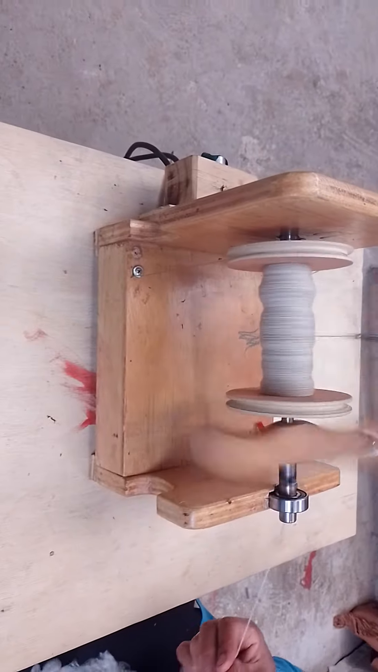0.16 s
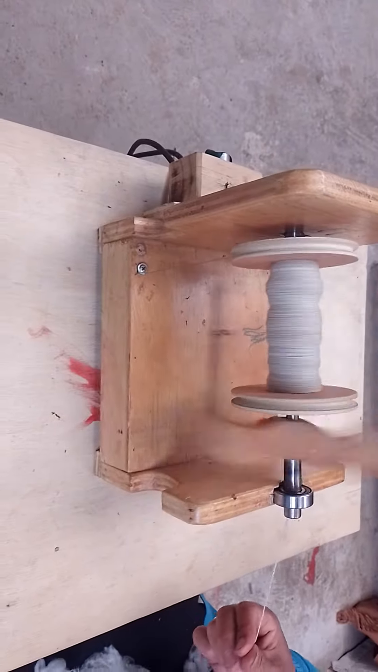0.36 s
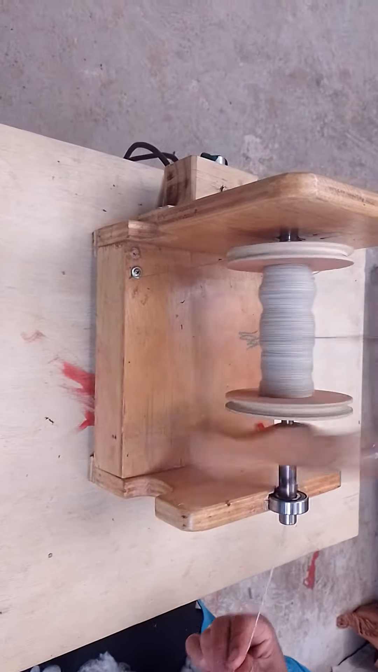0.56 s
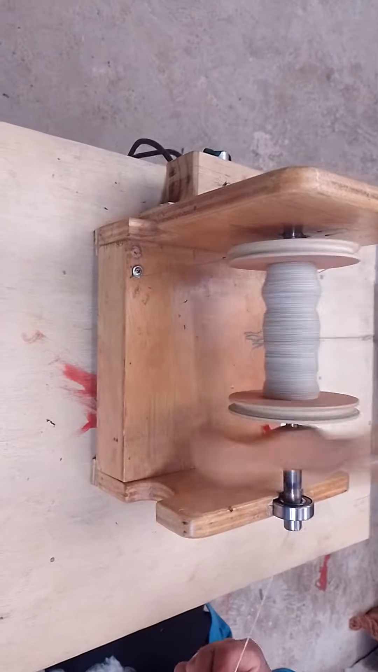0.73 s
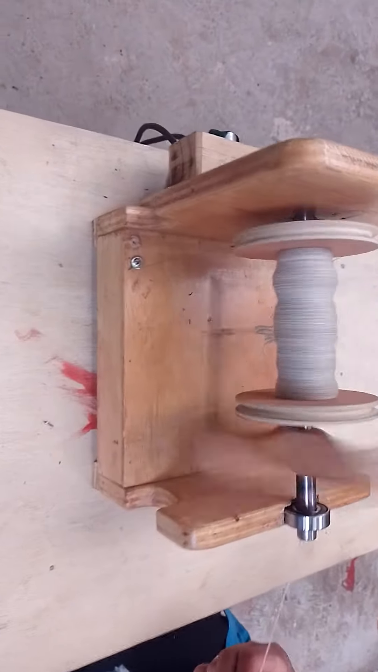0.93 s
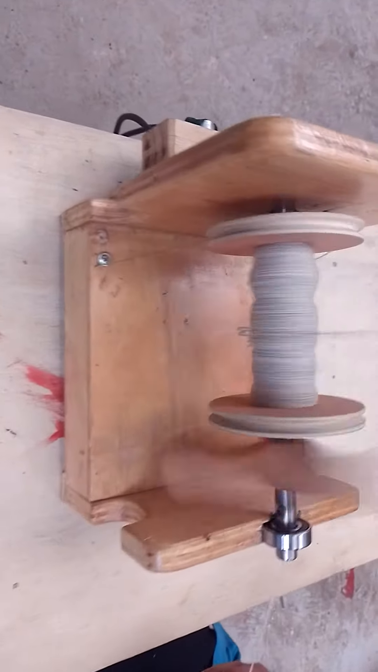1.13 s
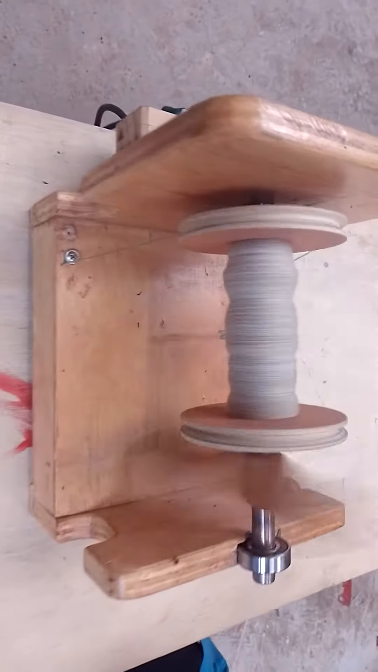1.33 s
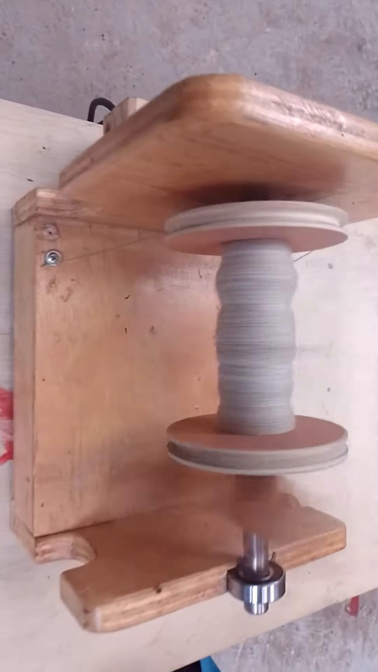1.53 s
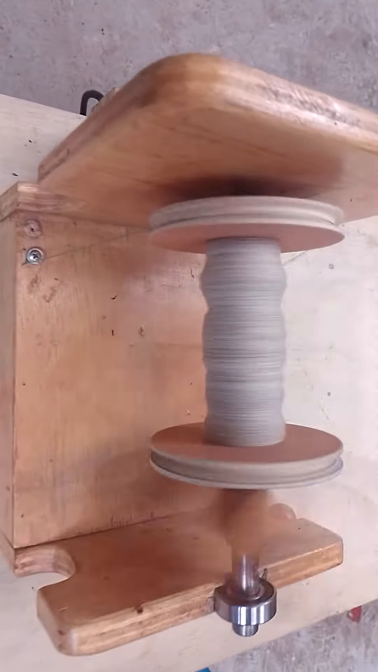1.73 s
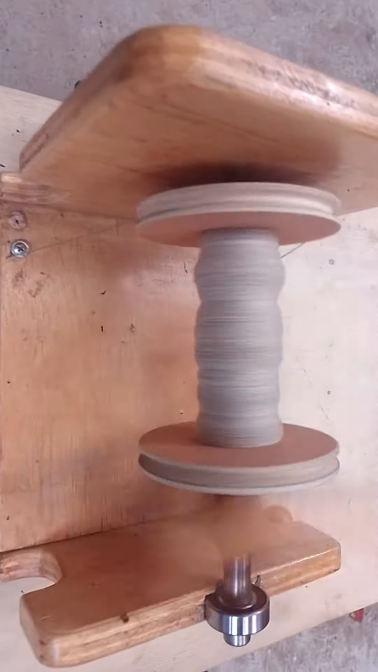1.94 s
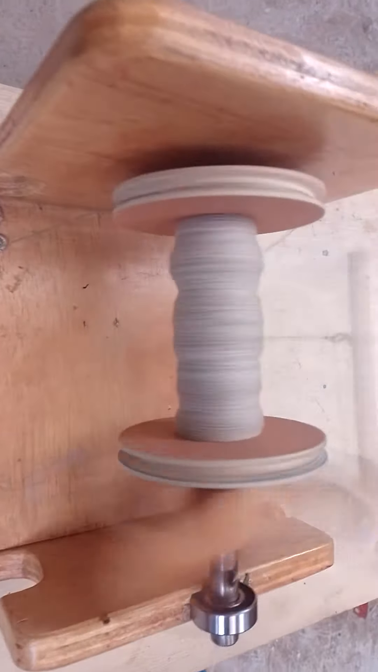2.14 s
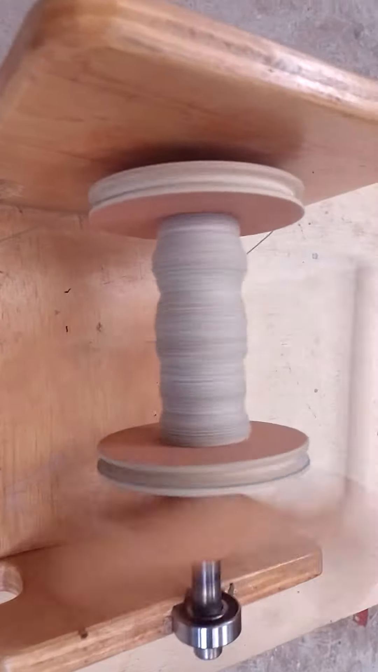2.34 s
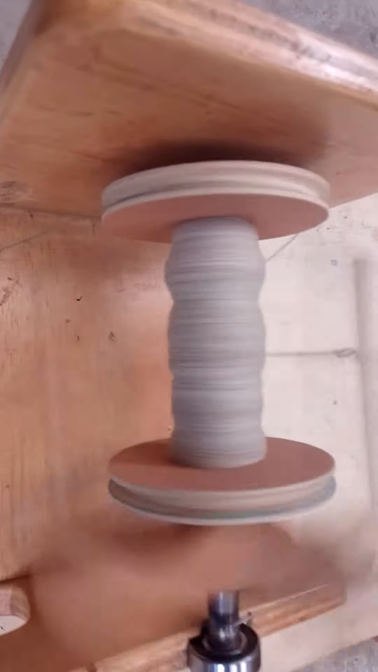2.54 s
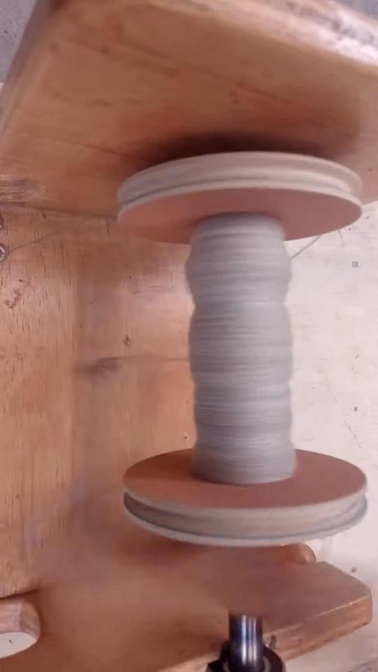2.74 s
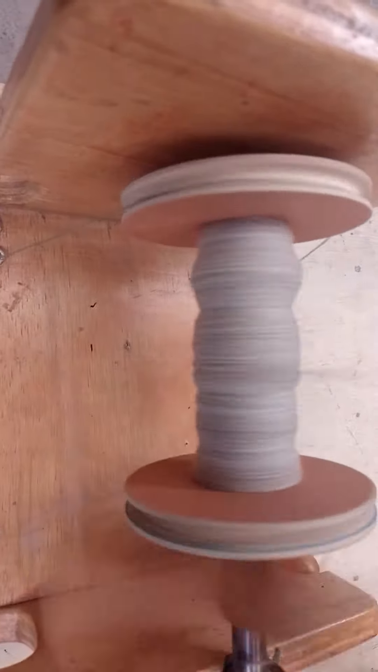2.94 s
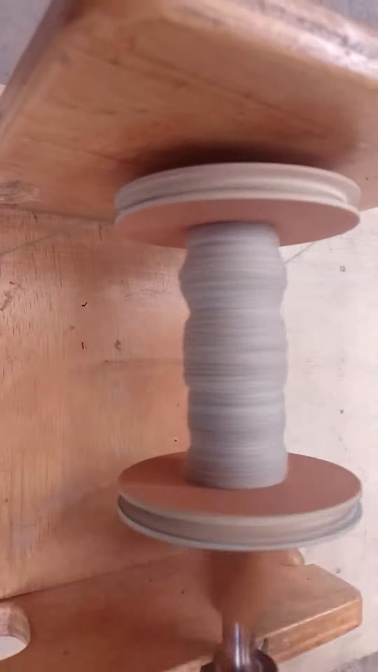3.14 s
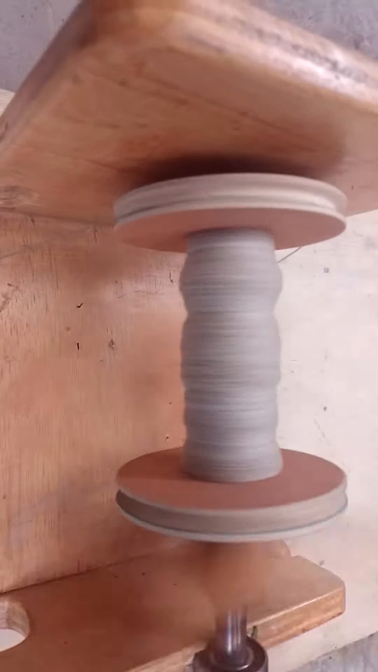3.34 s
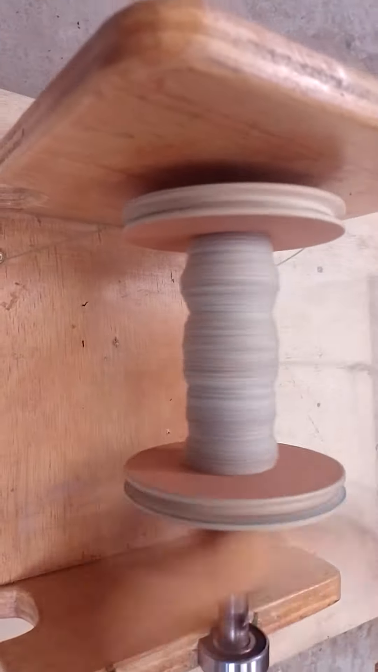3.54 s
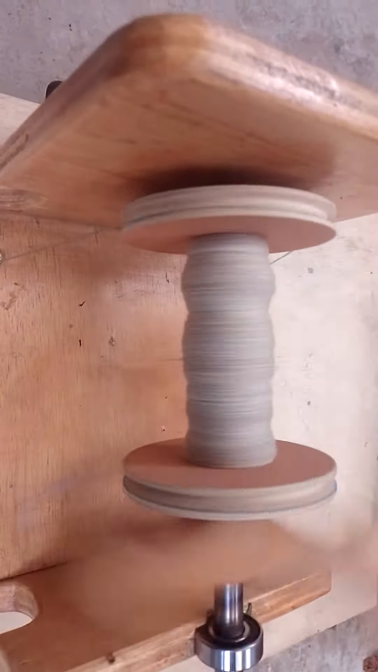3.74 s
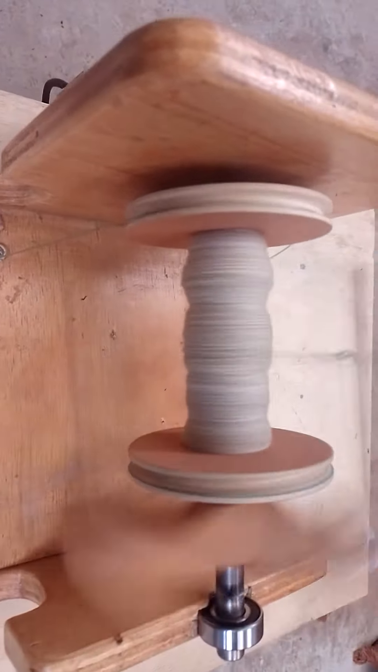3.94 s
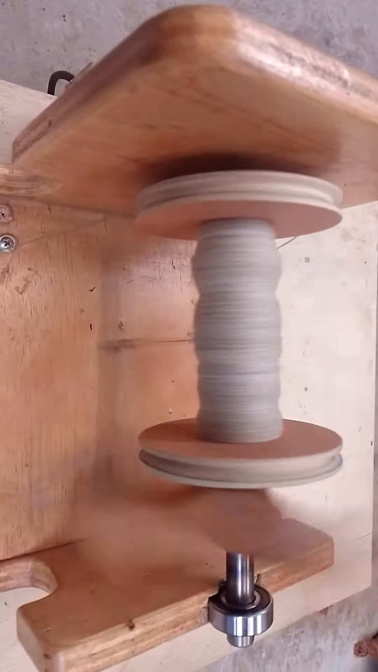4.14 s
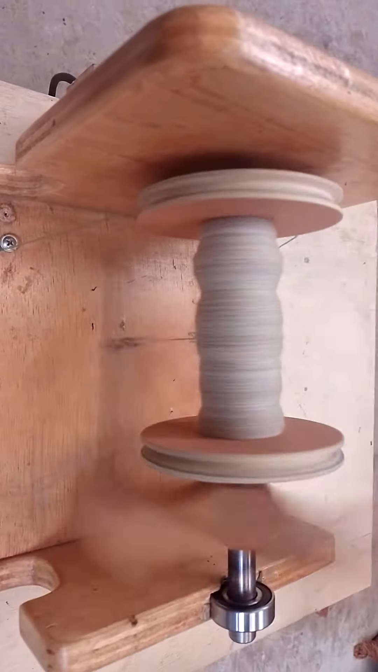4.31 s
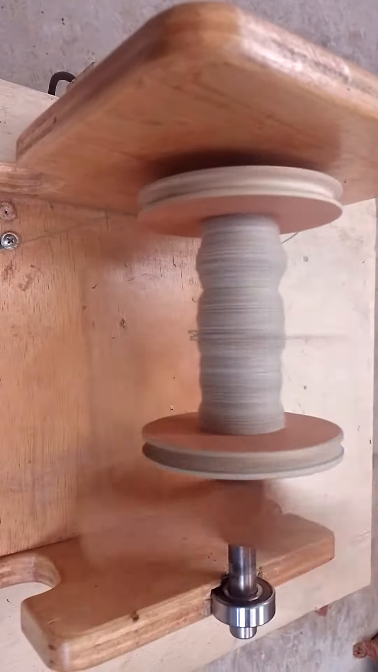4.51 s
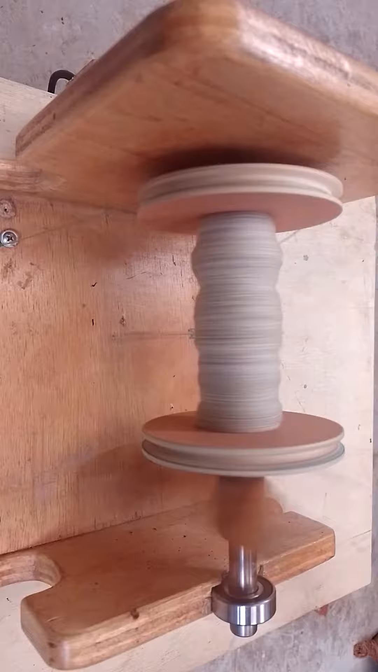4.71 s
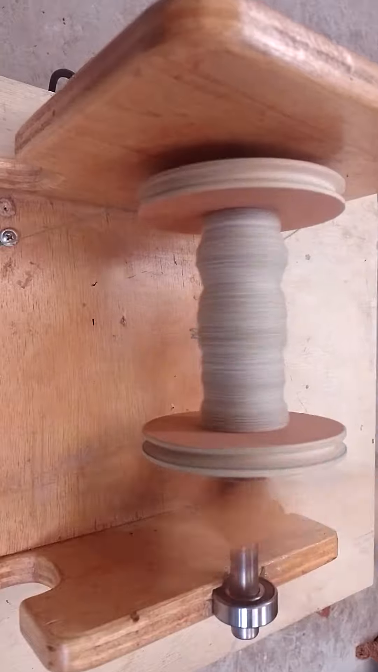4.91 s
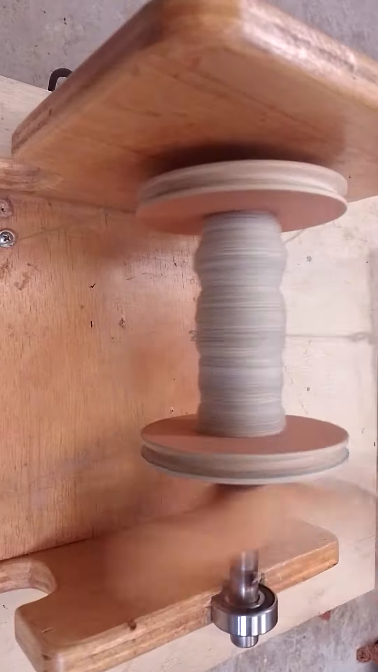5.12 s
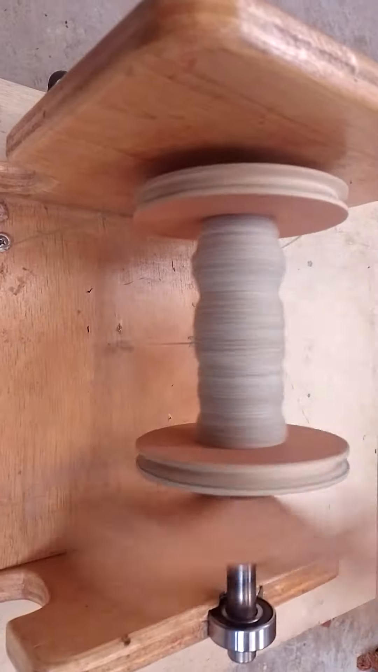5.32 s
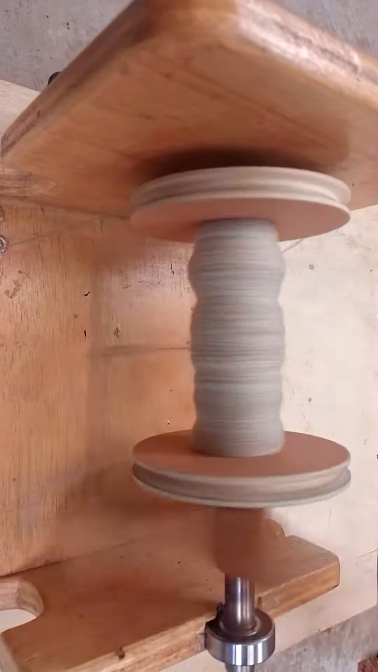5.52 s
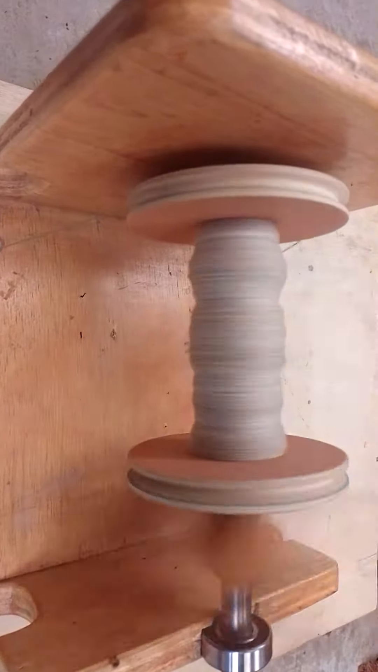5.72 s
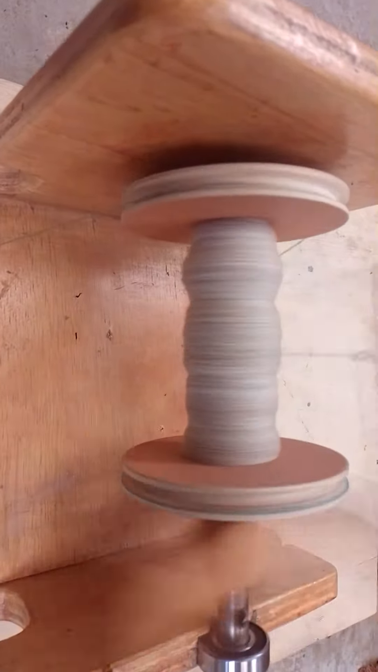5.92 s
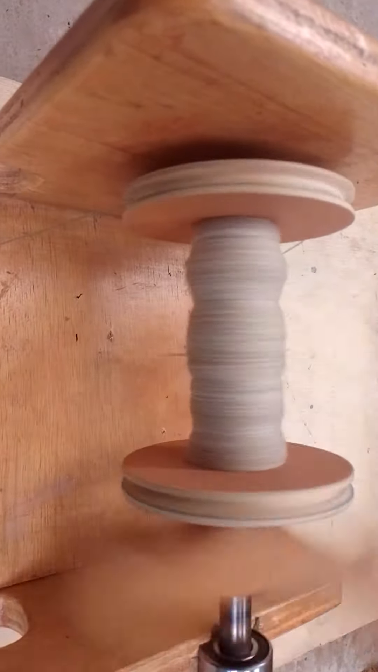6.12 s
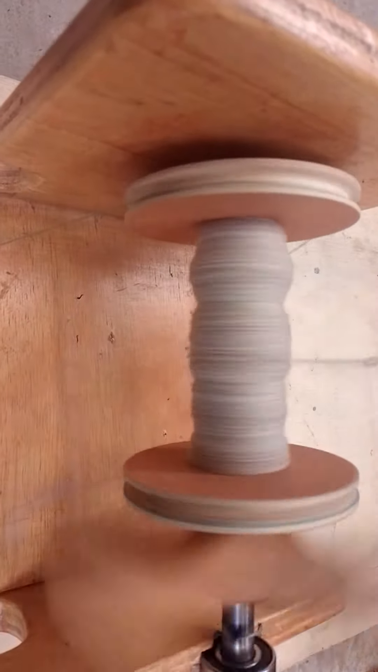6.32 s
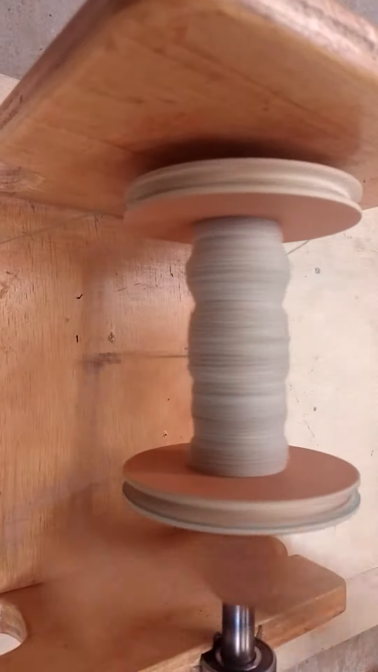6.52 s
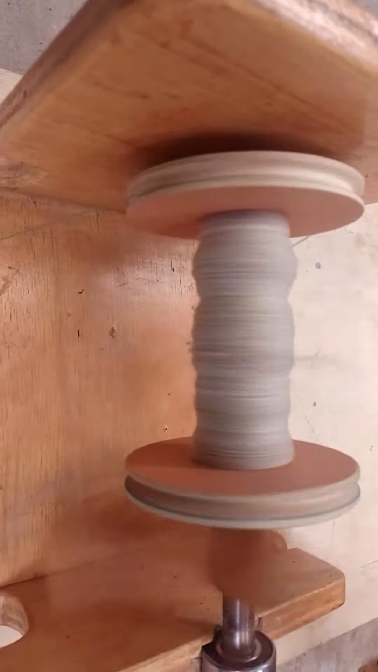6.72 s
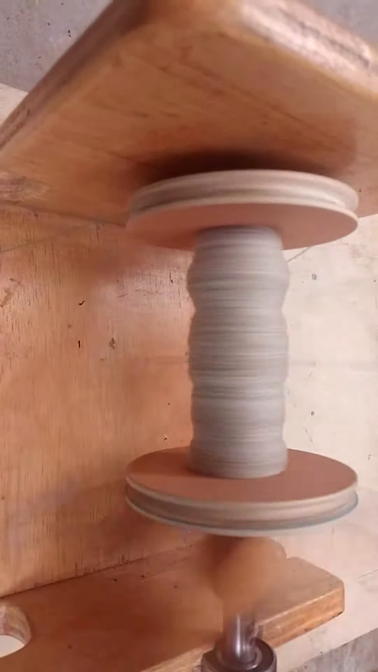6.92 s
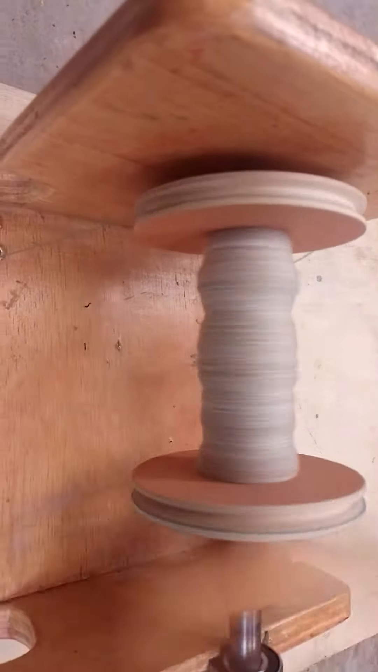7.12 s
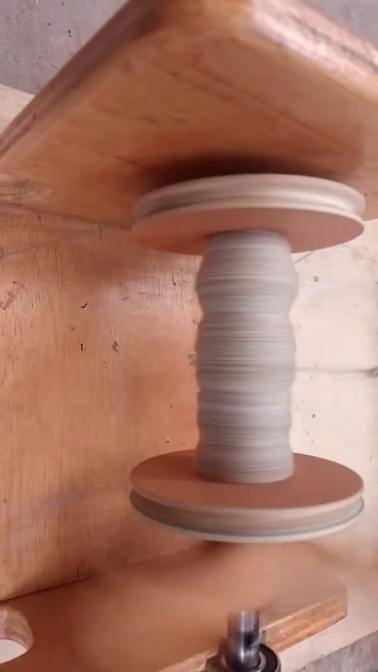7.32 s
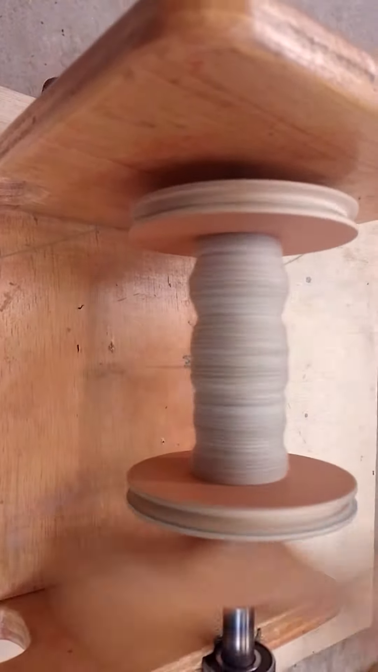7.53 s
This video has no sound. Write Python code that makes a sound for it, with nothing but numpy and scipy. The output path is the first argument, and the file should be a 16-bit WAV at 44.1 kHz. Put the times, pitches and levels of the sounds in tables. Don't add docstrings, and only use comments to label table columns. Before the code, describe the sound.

A small electric spinning wheel runs continuously on a wooden table indoors. Its motor whine wavers rapidly with an uneven drive band, over a low wooden drone. The microphone starts at a little distance, swings round the side where bearing hiss and metallic ringing rise, then moves close to the loose bobbin. Rapid paired ticks, about twelve turns a second, grow into hard irregular slaps that stay strong to the end.

```python
import sys
import numpy as np
from scipy import signal
from scipy.io import wavfile

SR = 44100
rng = np.random.default_rng(int(sys.argv[2]) if len(sys.argv) > 2 else 0)


def wav_out(sig):
    wavfile.write(sys.argv[1], SR, np.round(np.clip(np.atleast_2d(sig).T, -1, 1) * 32767).astype(np.int16))


def how_loud(loudness_db):
    steps = np.asarray(loudness_db, float) / 20
    return 10 ** steps


N = 337806

MOTOR_TURNS_PER_LAP, FLYER_TURNS_PER_LAP, BOBBIN_TURNS_PER_LAP = 26, 4.73, 4.92


def rms_one(x):
    return x / np.sqrt(np.mean(x ** 2) + 1e-20)


def in_time(rows):
    s, *columns = np.transpose(rows)
    return [np.interp(np.arange(N) / SR, s, c) for c in columns]


def drift(rate_hz):
    r = np.exp(-40 * np.pi * rate_hz / SR)
    noise = rng.standard_normal(N // 20 + 4002)
    slow = signal.lfilter([1], [1, -2 * r, r * r], noise)[4000:]
    return np.interp(np.arange(N) / 20, np.arange(len(slow)), rms_one(slow))


def band_pass(x, low_hz, high_hz):
    return signal.sosfilt(signal.butter(2, [low_hz, high_hz], "band", fs=SR, output="sos"), x)


def resonance(x, hz, width_hz):
    r = np.exp(-np.pi * width_hz / SR)
    top = (1 - r * r) / 2
    return signal.lfilter([top, 0, -top], [1, -2 * r * np.cos(2 * np.pi * hz / SR), r * r], x)


def colour(x, spectra, viewpoint, size):
    hz, s, frames = signal.stft(x, SR, nperseg=size, noverlap=size * 3 // 4)
    log_hz = np.log(hz + 1)
    shapes = []
    for spectrum in spectra:
        point_hz, point_db = np.transpose(spectrum)
        shapes.append(np.interp(log_hz, np.log(point_hz), point_db, -200, -200))
    at = np.interp(s, np.arange(N) / SR, viewpoint)
    shares = np.array([np.interp(at, np.arange(len(spectra)), row) for row in np.eye(len(spectra))])
    gain = how_loud(np.array(shapes).T @ shares) * np.sqrt(SR / 2)
    return signal.istft(frames * gain, SR, nperseg=size, noverlap=size * 3 // 4)[1][:N]


def grit(per_s, spread_db, share):
    sizes = how_loud(spread_db * np.minimum(rng.exponential(1, N), 3)) * rng.choice([-1, 1], N)
    knocks = rms_one(sizes * (rng.random(N) < per_s / SR))
    share = np.clip(share, 0, 1)
    return np.sqrt(1 - share) * rng.standard_normal(N) + np.sqrt(share) * knocks


def whine(pitch_hz, level_db):
    phase = 2 * np.pi * np.cumsum(pitch_hz + 9 * drift(25)) / SR
    return np.sqrt(2) * how_loud(level_db + .7 * drift(20)) * np.sin(phase)


def mode(pitch_hz, width_hz, level_db):
    phase = 2 * np.pi * np.cumsum(pitch_hz) / SR
    return how_loud(level_db) * (drift(width_hz) * np.sin(phase) + drift(width_hz) * np.cos(phase))


def motor(pitch_hz, level_db, lap_db):
    tone = whine(pitch_hz, level_db + 1.55 * lap_db - 1)
    return tone + mode(pitch_hz, 30, level_db - 12 + 1.2 * lap_db)


def board(pitch_hz, level_db, lap_db):
    board_hz = .694 * pitch_hz
    tone = whine(board_hz, level_db - 11.5 + 1.33 * lap_db)
    return tone + mode(board_hz, 37, level_db - 12 + 1.66 * lap_db)


def bracket(frame_view, level_db, lap_db):
    side_lift_db = 8.3 * np.clip(1 - 1.2 * np.abs(frame_view - 1.25), 0, 1)
    pitch_hz = 1893.0 + 16 * drift(12)
    return whine(pitch_hz, level_db - 13 + side_lift_db + 2.3 * lap_db + .6 * drift(6))


def passing(laps, place, width):
    return np.exp(-.5 * (((laps - place + .5) % 1 - .5) / width) ** 2)


# place_laps, drag_db
STIFF_SPOTS = [
    (.068, 10.3),
    (.203, 11.3),
    (.388, 6.1),
    (.61, 1.2),
    (.749, 8.6),
    (.924, 10.4),
]


def drag(laps, lead, width):
    db = sum(drag_db * passing(laps + lead, place, width) for place, drag_db in STIFF_SPOTS)
    return db - db.mean()


def band_load(laps):
    bobbin = np.cos(2 * np.pi * BOBBIN_TURNS_PER_LAP * laps)
    bobbin_early = np.cos(2 * np.pi * (BOBBIN_TURNS_PER_LAP * laps + .2))
    flyer = np.cos(2 * np.pi * (FLYER_TURNS_PER_LAP * laps - .65))
    joint_lap = .6
    sag_hz = 2.4 * drag(laps, .02, .032)
    joint_rise_hz = 34 * passing(laps, joint_lap, .035)
    pitch_hz = 1344 - sag_hz + joint_rise_hz + 6.5 * (bobbin + .8 * flyer)
    whine_db = -1.25 * drag(laps, 0, .024) + .9 * bobbin + .3 * flyer - .5
    board_db = -.47 * drag(laps, .026, .036) + 3.6 * passing(laps + .02, joint_lap, .03)
    board_db = board_db + 1.5 * bobbin + flyer - .4
    bracket_db = .6 * drag(laps, .023, .02) - 2 * passing(laps + .09, joint_lap, .2)
    bracket_db = bracket_db - .9 * bobbin_early + .4
    grip_db = -.33 * drag(laps, 0.043, 0.021) + 0.69 * bobbin_early
    return pitch_hz, whine_db, board_db, bracket_db, grip_db


# turns, first_tick_s, second_tick_lag_s
FLYER_TRAVEL = [(0, .007, .06), (15, 1.249, .053), (31, 2.561, .048), (46, 3.802, .045), (61, 5.048, .037),
                (77, 6.376, .033), (92, 7.617, .033)]
# start_s, first_tick_peak_db, second_tick_peak_db
BOBBIN_PLAY = [(0, -17.5, -30), (.45, -21, -36), (.6, -35, -34), (1.75, -32, -27), (2.049, -11, -22),
               (2.25, -12, -27), (2.75, -10, -26), (3.118, -1, -12), (3.298, -9.5, -18), (3.6, -14, -22),
               (4.1, -11, -26), (4.45, -14.5, -21), (4.9, -7, -23), (5.35, -6, -19), (6.45, -4.5, -19),
               (6.68, -7.5, -24), (6.95, -1, -17), (7.66, -7.5, -12)]
# start_s, peak_db, knock_share_db, sizzle_share_db
HARD_SLAPS = [(0.6943, -20, -15, -22), (1.4644, -14, -20, -11), (1.5457, -12, -8, -15),
              (2.034, -10, -29, -16), (2.364, -7, -13, -17), (2.3967, -12, -22, -18), (2.727, -4, -18, -17),
              (2.939, -5.5, -19, -10), (3.0236, -9, -17, -7), (3.0752, -7, -14, -11), (3.269, -1.5, -24, 0),
              (3.3516, -5.5, -11, -7), (3.5985, -8, -8, -10), (3.722, -3.5, -24, -8),
              (3.7651, -10, -28, -12), (3.9282, -9, -5, -9), (4.0926, -7.5, -9, -9), (4.2592, -3, -8, 0),
              (4.342, -9.5, -12, -22), (4.835, -9, -19, -12), (5.0877, -12, -15, -18), (5.4957, -7, -22, 2),
              (5.6628, -5.5, -12, -7), (5.8296, -2.5, -9, -2), (6.0779, -2.5, -10, -7),
              (6.1612, -9, -15, -6), (6.242, -6, -8, -14), (6.409, -7, -14, -6), (7.037, 0, -13, -16),
              (7.1976, -1.5, -14, -9)]
KNOCK_DB, SIZZLE_DB = [-14, -17], [-15, -14]
SIZZLE_ARRIVES_S = 3.4


def tick_rows():
    turns, first_s, lag_s = np.transpose(FLYER_TRAVEL)
    turn = np.arange(turns[-1] + 1)
    first = np.interp(turn, turns, first_s)
    s = np.r_[first, first + np.interp(turn, turns, lag_s)]
    second = np.repeat([0, 1], len(turn))
    at, *play_db = np.transpose(BOBBIN_PLAY)
    chance = rng.standard_normal((len(s), 4))
    peak_db = np.choose(second, [np.interp(s, at, db) for db in play_db])
    peak_db = peak_db + 1.2 * (1 + second) * chance[:, 0]
    tick_s = s + .001 * chance[:, 1]
    knock_db = np.take(KNOCK_DB, second) + 0.5 * chance[:, 2]
    hidden_db = -8 * np.clip(1 - s / SIZZLE_ARRIVES_S, 0, 1)
    sizzle_db = np.take(SIZZLE_DB, second) + hidden_db + 0.5 * chance[:, 3]
    rows = np.c_[tick_s, peak_db, knock_db, sizzle_db]
    free = np.abs(s[:, None] - np.array(HARD_SLAPS)[:, 0]).min(axis=1) > .012
    rows[~free, 1] = -120
    return np.r_[rows, HARD_SLAPS]


def ticks():
    out, t, rows = np.zeros(N + 1600), np.arange(-500, 600) / SR, tick_rows()
    start_s, count = rows[:, 0], len(rows)
    ring_spread_hz = 340 * np.clip(start_s / SIZZLE_ARRIVES_S, .2, 1)
    rings_hz = 5520 + 190 * start_s + ring_spread_hz * rng.standard_normal(count)
    run_up_db = np.minimum(-18.5 + 7 * rng.standard_normal((count, 1, 1)), -3)
    run_up = how_loud(run_up_db) * np.exp(-np.abs(t) / 0.0038)
    landing = np.clip(t / 0.00044, 0, 1) * how_loud(-60 * t / 0.012)
    chatter = rng.standard_normal((count, 3, len(t))) * (run_up + landing)
    knocks = band_pass(chatter[:, 0], 3100, 3900)
    sizzles = band_pass(band_pass(chatter[:, 2], 9200, 11470), 7400, 11500)
    sizzles = sizzles + how_loud(-31) * band_pass(chatter[:, 2], 15000, 17000)
    for row, ring_hz, knock, metal, sizzle in zip(rows, rings_hz, knocks, chatter[:, 1], sizzles):
        s, peak_db, knock_db, sizzle_db = row
        ring = rms_one(band_pass(metal, 0.892 * ring_hz, 1.147 * ring_hz))
        ring = ring + .5 * rms_one(band_pass(metal, 3300, 10000))
        tick = how_loud(knock_db + 19.5) * rms_one(knock) + how_loud(4.0) * ring
        tick = tick + how_loud(sizzle_db + 20) * rms_one(sizzle)
        out[round(s * SR):][:len(t)] += how_loud(peak_db - 4.0) * tick / np.abs(tick).max()
    return out[500:N + 500]


# pitch_hz, level_db (per Hz)
FAR_HISS = [(4221, -86), (4565, -82), (4910, -60), (5082, -86), (5340, -63.5), (6029, -65), (6460, -97),
            (8050, -79.5), (8441, -70.5), (8699, -70), (9302, -65.5), (10767, -86.5), (11628, -83),
            (15676, -87)]
SIDE_HISS = [(4221, -85), (4479, -96), (4737, -74), (6202, -69), (7235, -96.5), (8958, -67), (9647, -78.5),
             (10508, -85), (10767, -91), (11197, -88), (12834, -88), (14901, -90), (15504, -99.2),
             (15676, -97.2)]
CLOSE_HISS = [(4221, -64), (4479, -75), (4737, -63), (5512, -74.5), (5943, -64.5), (7321, -68.5),
              (9647, -60.5), (10422, -68), (11111, -67), (12059, -77), (12145, -70), (13264, -92),
              (15073, -76), (15676, -92)]
ABOVE_HISS = [(4221, -70.5), (4651, -73), (4823, -67), (5280, -75), (6115, -68.5), (7752, -74), (8096, -79),
              (8613, -63), (9388, -65), (11542, -75.5), (12145, -79), (13178, -91), (15246, -86),
              (15676, -87)]
# pitch_hz, width_hz, lift_db, lobe_viewpoint (where it points)
SHAFT_RINGS = [(4830, 77, 0.5, 1.5), (5370, 79, 4, .5), (5800, 120, -3, 0.2), (6130, 150, -1, 1.2),
               (7280, 67, 11, 1.2), (7780, 72, 11, 1.7), (8350, 56, 6, 0.65), (9060, 51, 4, 0.51),
               (9500, 70, 7, 0.78), (10000, 28, 8, 1.3), (10800, 60, 10, 1.1), (12190, 60, 6, 1.4)]


def bearings(viewpoint, laps, level_db, grip_db):
    throb_db = 2.0 * np.cos(2 * np.pi * (MOTOR_TURNS_PER_LAP * laps + 0.45))
    low = grit(1200, spread_db=10.0, share=0.44) * how_loud(2.8 * grip_db + 1.4 * drift(30))
    middle = grit(1200, spread_db=12.0, share=0.2) * how_loud(0.16 * grip_db + 2.36 * drift(50))
    high = grit(1500, spread_db=2.0, share=0.99) * how_loud(1.34 * grip_db + throb_db + 1.5 * drift(44))
    top = grit(600, spread_db=6.0, share=0.37) * how_loud(2.0 * drift(16) - 2)
    rub = band_pass(low, 1450, 5030) + band_pass(middle, 4950, 7390)
    rub = rub + band_pass(high, 6970, 10900) + band_pass(top, 12900, 16200)
    rub = rub * how_loud(level_db - 2.0)
    push = rub
    for hz, width_hz, lift_db, lobe in SHAFT_RINGS:
        off_lobe_db = 9.5 * np.minimum(np.abs(viewpoint - lobe), .9)
        push = push + how_loud(lift_db + 2.0 * drift(1.5) - off_lobe_db) * resonance(rub, hz, width_hz)
    return colour(push, [FAR_HISS, SIDE_HISS, CLOSE_HISS, ABOVE_HISS], viewpoint, size=512)


# pitch_hz, level_db (per Hz)
FAR_FRAME = [(818, -66), (991, -58.5), (1206, -59.5), (1981, -58.5), (2153, -67), (2326, -60), (2498, -62),
             (2842, -71), (3359, -68.5), (3531, -97), (3661, -67), (4005, -99), (4177, -87), (4264, -85)]
SIDE_FRAME = [(818, -62.5), (991, -57.5), (1034, -58), (1206, -55), (1593, -57), (1680, -53), (1981, -52.5),
              (2153, -57), (2541, -51.5), (2756, -57.5), (2842, -67.5), (3747, -69), (4134, -84.5),
              (4264, -90)]
NEAR_FRAME = [(818, -83), (861, -58), (991, -59.5), (1077, -63), (1206, -54), (1981, -59.5), (2110, -66.5),
              (2369, -73), (2498, -61.5), (2627, -57.5), (2842, -71), (2972, -64.5), (3747, -63),
              (4264, -71.5)]


def frame(viewpoint, grip_db, level_db):
    push = grit(900, spread_db=4.5, share=0.28) * how_loud(level_db + 1.34 * drift(34))
    low = signal.sosfiltfilt(signal.butter(2, 2150, "low", fs=SR, output="sos"), push)
    high = signal.sosfiltfilt(signal.butter(2, 2150, "high", fs=SR, output="sos"), push)
    low = low - 0.13 * resonance(low, 1277, 136)
    push = low + high * how_loud(1.22 * grip_db)
    return colour(push, [FAR_FRAME, SIDE_FRAME, NEAR_FRAME], viewpoint, size=1024)


# pitch_hz, level_db (per Hz)
TABLE_DRONE = [(22, -95.9), (43, -100.5), (140, -79), (161, -87), (194, -68), (215, -77), (237, -65.5),
               (431, -63.5), (452, -63.5), (506, -61), (538, -62.5), (721, -65.5), (754, -63), (829, -67.5)]
# pitch_hz, width_hz, level_db
TABLE_TOP = [
    (195, 6.7, -59.5),
    (246, 4.7, -56),
    (323.4, 5.8, -50),
    (377.7, 6.1, -49),
    (1195, 47, -49.5),
]


def table(viewpoint, laps, level_db):
    push = grit(300, spread_db=15.5, share=0.12) * how_loud(1.87 * drift(33))
    flyer_angle = 2 * np.pi * FLYER_TURNS_PER_LAP * laps
    arms = np.cos(flyer_angle) + 0.88 * np.cos(2 * flyer_angle)
    near_db = 2.8 * np.minimum(viewpoint - 2, 0)
    puffs = rng.standard_normal(N) * how_loud(near_db + 1.5 * arms + 1.8 * drift(2.7))
    push = band_pass(puffs, 12, 143) + band_pass(push, 214, 1800)
    drone = colour(push, [TABLE_DRONE], viewpoint, size=8192)
    hum = sum(mode(np.full(N, hz), width_hz, db) for hz, width_hz, db in TABLE_TOP)
    return how_loud(level_db) * (drone + hum)


# start_s, laps
BAND_TRAVEL = [(0, -.023), (1.25, 3.208), (2.5, 6.428), (3.75, 9.624), (5, 12.837), (6.3, 16.134),
               (7.66, 19.605)]
# start_s, whine_db, rubbing_db
MIC_PATH = [(0, -31, -1.5), (.5, -32, -4), (.9, -30.5, -4), (1.15, -31.5, -1), (1.8, -27, 4.5),
            (2.2, -27.5, 2), (2.45, -27, -2), (2.7, -25, -3), (3.05, -24.5, -1), (3.6, -26.5, -0.5),
            (4, -27.5, -0.5), (4.4, -26, 1.5), (4.9, -27, 0.5), (5.4, -26.5, 2), (6.4, -25.5, 2.5),
            (6.9, -25.5, 3), (7.66, -25.5, 1)]
# start_s, bearing_view (0 far, 1 side, 2 close, 3 above),
# frame_view (0 far, 1 side, 2 near)
MIC_VIEW = [(0, 0, 0), (.85, .05, .15), (1.2, .55, .9), (1.45, 1, 1), (2.1, 1.15, 1.15), (2.45, 1.6, 1.35),
            (2.7, 2, 2), (3.3, 2, 2), (3.6, 2.6, 2), (4.6, 3, 2), (7.66, 3, 2)]


def scene():
    laps, = in_time(BAND_TRAVEL)
    viewpoint, frame_view = in_time(MIC_VIEW)
    whine_db, hiss_db = in_time(MIC_PATH)
    pitch_hz, lap_whine_db, board_db, bracket_db, grip_db = band_load(laps)
    pitch_hz = pitch_hz + .55 * (pitch_hz - pitch_hz.mean())
    mix = motor(pitch_hz, whine_db, lap_whine_db)
    mix = mix + board(pitch_hz, whine_db, board_db)
    mix = mix + bracket(frame_view, whine_db, bracket_db)
    mix = mix + ticks()
    mix = mix + bearings(viewpoint, laps, hiss_db, grip_db)
    mix = mix + frame(frame_view, grip_db, 0.55 + 0.18 * (whine_db + 25.5))
    mix = mix + table(viewpoint, laps, 0.57 * (whine_db + 23.5))
    return mix[None]


def roll_off(x):
    return signal.sosfilt(signal.butter(12, 16350, fs=SR, output="sos"), x)


def record(dry):
    mix = signal.sosfilt(signal.cheby2(14, 50, 16150, fs=SR, output="sos"), dry)
    return roll_off(mix)


dry = scene()
out = record(dry)
wav_out(out)
```